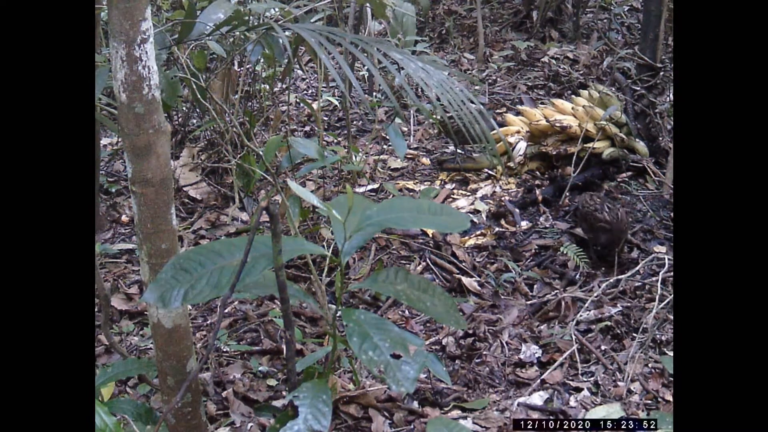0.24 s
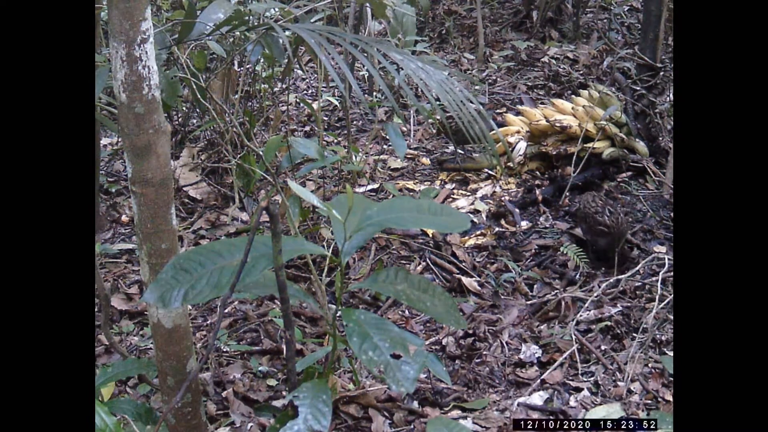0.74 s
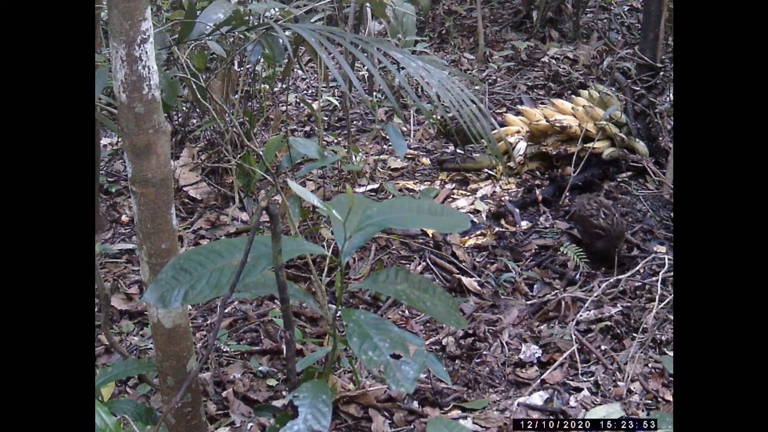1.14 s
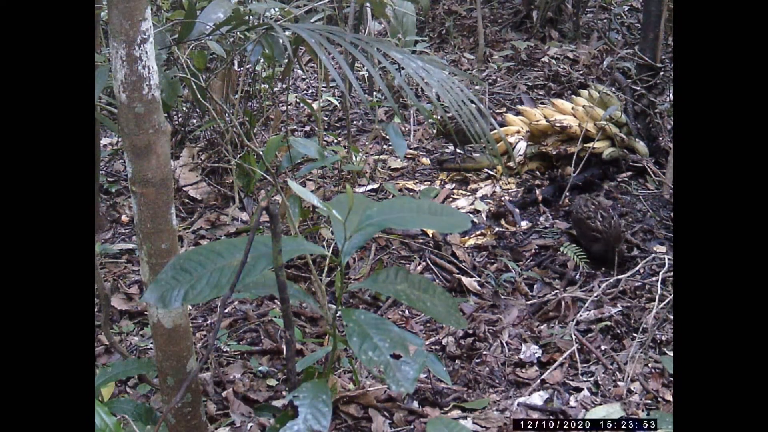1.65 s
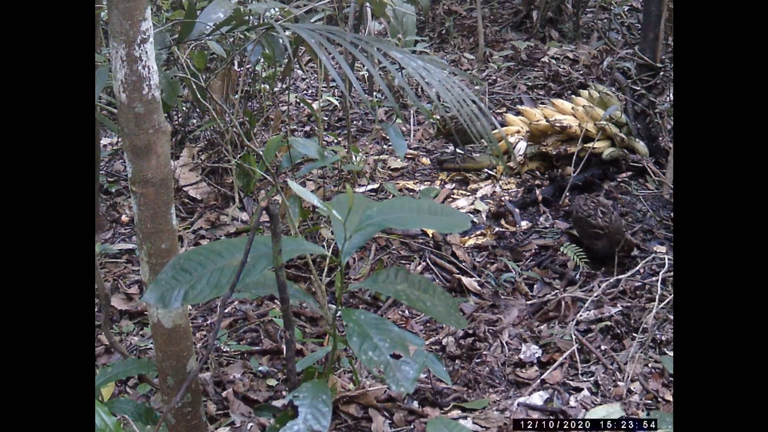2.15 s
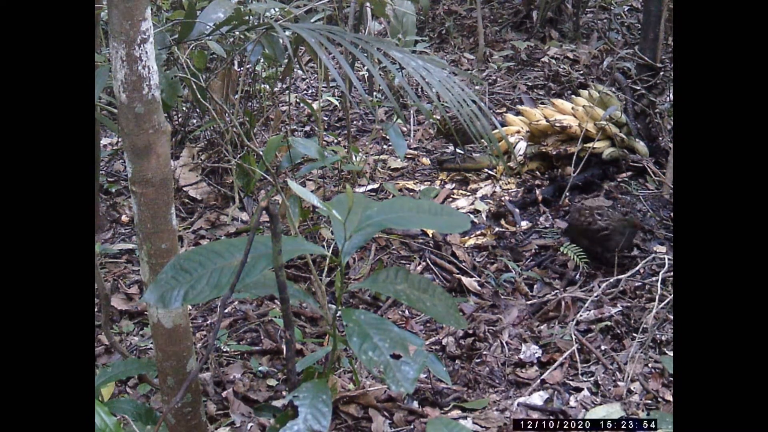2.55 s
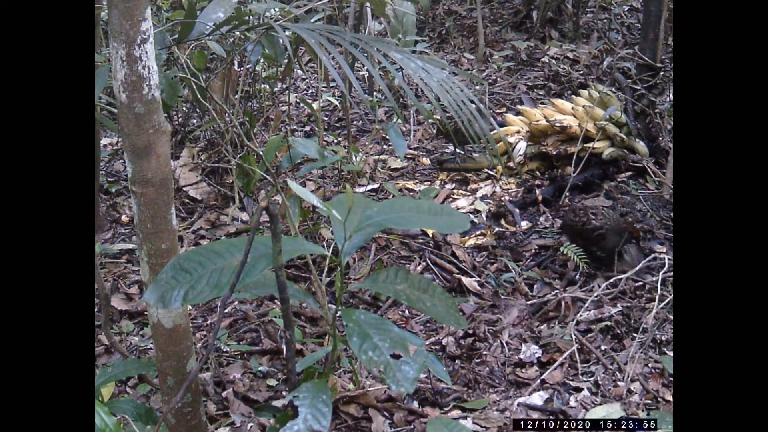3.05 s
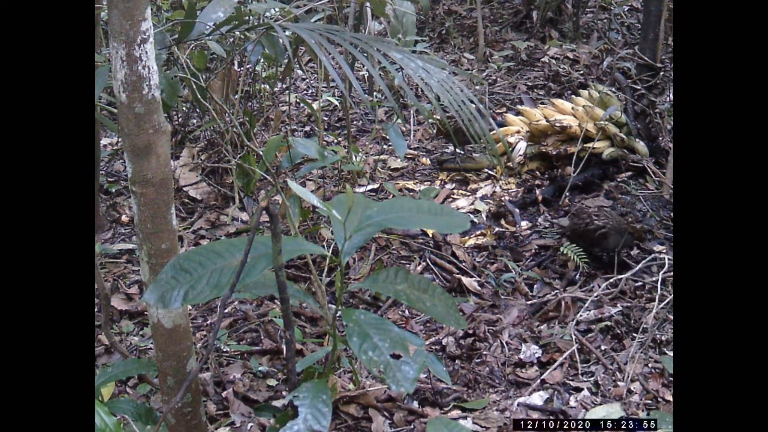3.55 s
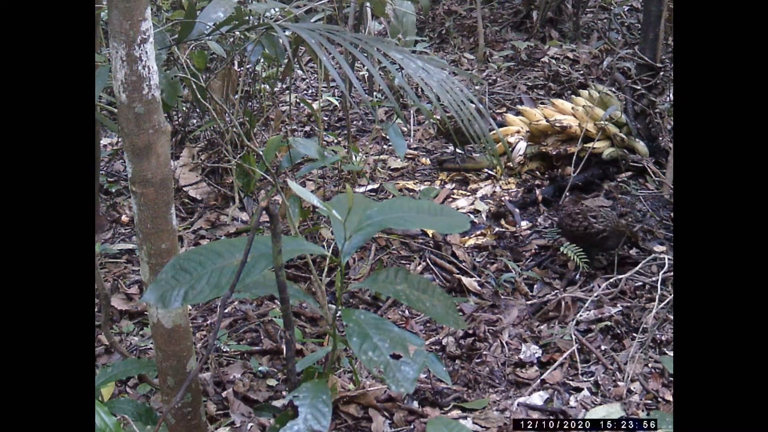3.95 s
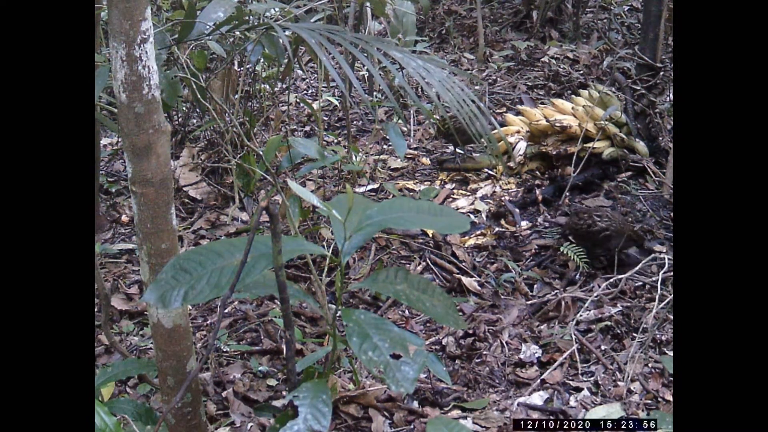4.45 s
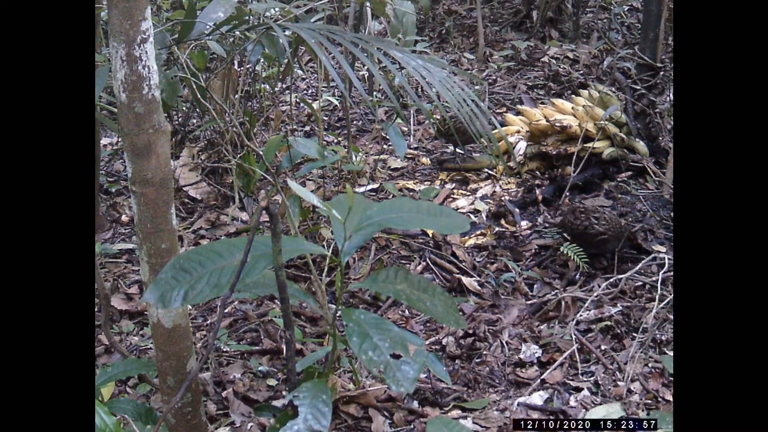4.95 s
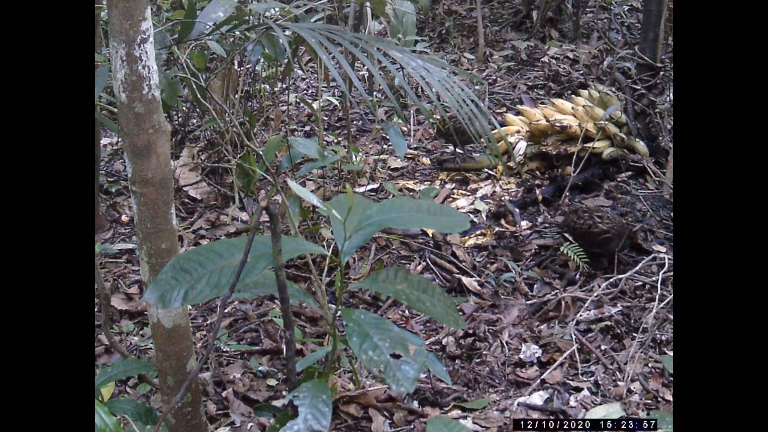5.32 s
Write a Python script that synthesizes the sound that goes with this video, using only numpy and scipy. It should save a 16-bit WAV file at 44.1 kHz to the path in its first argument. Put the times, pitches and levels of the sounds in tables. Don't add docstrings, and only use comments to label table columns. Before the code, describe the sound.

A quiet forest floor by day, heard through a small microphone with soft hiss, low lumpy air rumble, distant hum and faint insect buzz. From 0.05 to 0.55 s a songbird whistles a pure, stepping-down phrase, over a faint distant trill. At 0.95 to 1.6 s it gives a lower, beaded phrase, while the farther bird's fluttering paired rising chirps swell from 0.9 to 2 s, then fade by 2.8 s. Thin high squeaks waver from the canopy, mostly early on. A scooped whistle comes at 2.1 to 2.5 s. At 3 to 3.6 s the song climbs, then settles, as dry leaves crunch and snap until 3.9 s. A held note and quick warble follow at 4.05 to 4.5 s; a sharp snap lands at 4.56 s. The last dipping whistle begins at 5 s, with the trill returning stronger and leaves crackling to the end. Calls leave short woody tails.

```python
import sys
import numpy as np
from scipy import signal
from scipy.fft import rfft, irfft
from scipy.io import wavfile
from scipy.ndimage import uniform_filter1d

SR = 44100
rng = np.random.default_rng(int(sys.argv[2]) if len(sys.argv) > 2 else 0)


def natural_amplitude(level_db):
    exponent = np.asarray(level_db, float) / 20
    return 10 ** exponent


def dump_mix(stems):
    frames = np.atleast_2d(stems).T
    limited = np.clip(frames, -1, 1)
    pcm = np.round(limited * 32767).astype(np.int16)
    wavfile.write(sys.argv[1], SR, pcm)


N = 246057


def at_hz(points, hz):
    point_hz, level_db = np.transpose(points)
    return np.interp(np.log(hz + 1), np.log(point_hz), level_db)


def in_time(rows):
    s, *columns = np.transpose(rows)
    return [np.interp(np.arange(N) / SR, s, c) for c in columns]


def band_one(x, low_hz, high_hz):
    band = signal.sosfilt(signal.butter(4, [low_hz, high_hz], "band", fs=SR, output="sos"), x)
    return x / np.std(band)


def coloured(x, spectrum):
    gain_db = at_hz(spectrum, np.fft.rfftfreq(N, 1 / SR))
    return irfft(rfft(x) * natural_amplitude(gain_db), N)


def drift(rate_hz):
    r = np.exp(-2 * np.pi * rate_hz / SR)
    slow = signal.lfilter([1], [1, -2 * r, r * r], rng.standard_normal(N + SR))[SR:]
    return slow / np.std(slow)


def swells(rows, rise_db_per_s, fall_db_per_s, rest_db):
    t = np.arange(0, N, 20) / SR
    s, level_db, held_s = np.transpose(rows)[:, :, None]
    rising_db = rise_db_per_s * np.maximum(s - t, 0)
    falling_db = fall_db_per_s * np.maximum(t - s - held_s, 0)
    loudest_db = (level_db - rising_db - falling_db).max(axis=0)
    return np.maximum(np.interp(np.arange(N) / SR, t, loudest_db), rest_db)


def add(out, start_s, sound):
    at = round(start_s * SR)
    out[at:at + len(sound)] += sound[:N - at]


def glide(length_s, start_hz, end_hz, bend, soft):
    u = np.linspace(0, 1, round(length_s * SR))
    hz = start_hz + (end_hz - start_hz) * u ** bend
    arch = np.abs(np.sin(np.pi * u)) ** soft
    return np.sqrt(2) * arch * np.sin(2 * np.pi * np.cumsum(hz) / SR)


def trunks(x, t60_s, wet_db, first_s, direct=None, bead_db=2.0):
    t = np.arange(SR + SR // 2) / SR
    scatter = rng.standard_normal(len(t))
    near = scatter * natural_amplitude(-60 * t / t60_s)
    far = scatter[::-1] * natural_amplitude(-18 - 60 * t / 1.8)
    tail = (near + far) * np.clip(t / first_s, 0, 1) ** 2
    wet = signal.fftconvolve(x, tail / np.linalg.norm(tail))[:N]
    return (x if direct is None else direct) + natural_amplitude(wet_db + bead_db * drift(25)) * wet


# frequency in Hz, density in dB per Hz.
HUM_SPECTRUM = [(30, -4.5), (50, -6), (120, -15), (270, -19.5), (550, -24), (1000, -28), (2600, -32.5),
                (3500, -29.5), (4000, -40), (6400, -41.5), (7500, -71), (10000, -48.5), (15500, -41)]


def forest_hum():
    hum = band_one(coloured(rng.standard_normal(N), HUM_SPECTRUM), 145.6, 990)
    return hum * natural_amplitude(-65.5 + .7 * drift(4.05))


def insects():
    centre_hz, width_hz, level_db = 6000, 300, -73
    r = np.exp(-np.pi * width_hz / SR)
    resonance = [1, -2 * r * np.cos(2 * np.pi * centre_hz / SR), r * r]
    buzz = signal.lfilter([1, 0, -1], resonance, rng.standard_normal(N))
    return natural_amplitude(level_db + 1.5 * drift(5.5)) * buzz / np.std(buzz)


# frequency in Hz, density in dB per Hz.
RUMBLE_SPECTRUM = [(12, 8), (25, 5), (45, -11.5), (70, -10), (92, -14.5), (115, -38.5), (200, -59)]
# start in seconds, level in dB, hold in seconds.
GUSTS_ON_PORT = [(.06, -45.5, 0.12), (.25, -54, 0.079), (.5, -52, 0.56), (.75, -62, 0.17),
                 (.96, -46, 0.074), (1.4, -44, 0.012), (1.7, -47, 0.084), (2.07, -48.5, 0.0097),
                 (2.3, -50, 0.027), (2.7, -50.5, 0.19), (2.87, -59, 0.48), (3.37, -46.5, .01),
                 (3.7, -49, 0.036), (4.07, -49, 0.02), (4.3, -53.5, 0.029), (4.82, -56.5, 0.017),
                 (4.99, -53.5, 0.023), (5.33, -64, 0.13)]


def port_rumble():
    level_db = swells(GUSTS_ON_PORT, rise_db_per_s=219, fall_db_per_s=98.5, rest_db=-71)
    rumble = band_one(coloured(rng.standard_normal(N), RUMBLE_SPECTRUM), 9.4, 130)
    return rumble * natural_amplitude(level_db + 0.5 * drift(32))


# frequency in Hz, density in dB per Hz.
LITTER_SPECTRUM = [(1180, -31), (2000, -6), (2500, -6.5), (3320, -19), (3610, -11), (4180, -7), (5260, -7),
                   (10000, -24), (15500, -52)]
# frequency in Hz, density in dB per Hz.
CRUNCH_SPECTRUM = [(1500, -32.5), (2500, -10), (4000, -9), (5500, -5), (6500, -8.5), (8000, -15.5),
                   (10000, -21.5), (15500, -51)]
# start in seconds, level in dB, hold in seconds.
LITTER_STIRS = [(1.23, -71, 0.059), (1.5, -84, 0.022), (1.91, -71, 0.0082), (2.062, -95, 0.0021),
                (2.69, -83, 0.0057), (2.86, -71, 0.0088), (2.938, -73, 0.0025), (2.99, -67, 0.0083),
                (3.012, -60.5, 0.021), (3.05, -65, 0.048), (3.1, -63.5, 0.05), (3.155, -65, 0.041),
                (3.21, -65, 0.045), (3.28, -72, 0.025), (3.4, -77, 0.29), (3.35, -63, 0.026),
                (3.39, -69, 0.04), (3.604, -65, 0.0029), (3.668, -63, 0.021), (3.7, -65, 0.012),
                (3.722, -66, .008), (3.735, -69, .01), (3.748, -57.5, 0.012), (3.772, -64.5, 0.016),
                (3.826, -62.5, 0.02), (3.85, -69, 0.015), (3.9, -68.5, 0.085), (4.292, -68, 0.011),
                (4.33, -73.5, 0.088), (4.45, -70.5, 0.068), (4.562, -60.5, 0.0094), (4.6, -65.5, 0.07),
                (4.71, -67.5, 0.019), (4.76, -71, 0.034), (5.13, -67, 0.031), (5.3, -72.5, 0.084),
                (5.44, -61.5, 0.014), (5.49, -67, .02), (5.535, -64.5, 0.052)]


def leaf_crackle():
    stir_db = swells(LITTER_STIRS, rise_db_per_s=599, fall_db_per_s=395, rest_db=-120)
    rest_db = -76.5 + .8 * drift(8)
    sizes = natural_amplitude(1.8 * np.minimum(rng.exponential(1, N), 5)) * rng.choice([-1, 1], N)
    grains_per_s = 4500 * natural_amplitude(3.2 * drift(45))
    grains = sizes * (rng.random(N) < grains_per_s / SR)
    litter = band_one(coloured(grains, LITTER_SPECTRUM), 7980, 9450)
    crunch = band_one(coloured(grains[::-1], CRUNCH_SPECTRUM), 7880, 10260)
    return natural_amplitude(rest_db - 8.0) * litter + natural_amplitude(stir_db - 9.0) * crunch


# start in seconds, peak in dB, ring in Hz.
LEAF_SNAPS = [(0.9126, -50, 6180), (1.2294, -57, 4860), (1.305, -51, 6120), (2.06, -51, 8290),
              (2.6884, -55, 6560), (2.759, -65, 3550), (2.783, -58, 3550), (2.976, -54, 3470),
              (2.993, -52, 5210), (3.082, -55, 6000), (3.126, -55, 5500), (3.149, -58, 6500),
              (3.163, -51, 5000), (3.349, -56, 5220), (3.36, -52, 5840), (3.662, -58, 5300),
              (3.679, -57, 6000), (3.72, -53, 5460), (3.909, -55, 5650), (2.8345, -54, 4580),
              (2.8984, -51, 5900), (2.9352, -56, 7070), (3.009, -46, 6170), (3.02, -51, 5140),
              (3.027, -50, 4660), (3.103, -53, 4170), (3.108, -53, 6350), (3.178, -52, 4560),
              (3.208, -54, 3950), (3.3276, -45.5, 6440), (3.404, -61, 7670), (3.525, -50, 5320),
              (3.6032, -41, 5850), (3.6708, -53, 4580), (3.7056, -48, 5590), (3.751, -48, 5520),
              (3.7587, -48, 5420), (3.767, -40, 5000), (3.8, -56, 4900), (3.8285, -55, 5600),
              (3.8347, -48, 6030), (4.292, -53, 4420), (4.466, -59, 4390), (4.4957, -44, 4400),
              (4.564, -34.5, 6130), (4.713, -51, 2995), (5.1552, -71, 5570), (5.27, -52, 5630),
              (5.378, -52, 5550), (5.4156, -54, 5430), (5.447, -52, 5250), (5.535, -53, 5550),
              (5.572, -51, 5920), (4.58, -48, 5310)]


def leaf_snaps():
    out = np.zeros(N)
    t = np.arange(400) / SR
    leaf = signal.butter(3, [2000, 9500], "band", fs=SR, output="sos")
    for s, peak_db, hz in LEAF_SNAPS:
        crack = rng.standard_normal(len(t)) * natural_amplitude(-60 * t / 0.0078)
        ring = 1.77 * np.sin(2 * np.pi * hz * t) * natural_amplitude(-60 * t / 0.0045)
        add(out, s, natural_amplitude(peak_db) * signal.sosfilt(leaf, crack + ring))
    return out


# start and length in seconds, start
# and end in Hz, level in dB.
NEAR_GLIDES = [(.878, .112, 1640, 2680, -67), (2.925, .045, 1400, 1800, -68),
               (2.965, .016, 1800, 2230, -61), (2.98, .016, 2200, 1950, -65),
               (3.018, .025, 2100, 2150, -62), (4.092, .02, 1250, 1680, -70), (4.108, .02, 1640, 1740, -69),
               (4.56, .078, 1950, 2760, -62), (4.18, .07, 3700, 3490, -76), (2.236, .014, 1570, 1800, -57),
               (2.374, .014, 1570, 1800, -57), (2.515, .02, 1960, 1790, -53), (1.795, .03, 1300, 1720, -70)]
# start and length in seconds, start and end in Hz, level in dB.
FAR_SQUEAKS = [(.05, .04, 6220, 6200, -76), (.155, .075, 6000, 5930, -67), (.1, .15, 7100, 6600, -79),
               (.25, .07, 6750, 7050, -78), (.4, .13, 7150, 6700, -75), (.55, .05, 7150, 6900, -79),
               (.6, .12, 6750, 6380, -73), (.72, .1, 6450, 6300, -80), (.8, .19, 6500, 6150, -72),
               (1.0, .07, 6300, 6200, -76), (1.06, .11, 6200, 5850, -66), (1.23, .1, 6600, 6100, -76),
               (2.13, .16, 6620, 6280, -73), (2.3, .15, 6250, 6050, -77), (2.18, .06, 8650, 8420, -82),
               (4.05, .11, 6350, 6300, -72), (5.13, .1, 5700, 5600, -73), (3.69, .05, 2700, 2300, -68),
               (2.99, .03, 8400, 8000, -75), (3.03, .03, 7800, 7450, -73), (3.055, .04, 7500, 8200, -70),
               (3.11, .05, 8000, 7600, -75), (3.2, .03, 7600, 8150, -73)]


def small_birds():
    near, far = np.zeros((2, N))
    for out, calls, bend in ((near, NEAR_GLIDES, 1.25), (far, FAR_SQUEAKS, .8)):
        for s, length_s, start_hz, end_hz, level_db in calls:
            add(out, s, natural_amplitude(level_db) * glide(length_s, start_hz, end_hz, bend, soft=.35))
    near = near * natural_amplitude(2.5 * drift(40))
    far = far * natural_amplitude(5.5 * drift(350) - 2.5)
    near = trunks(near, t60_s=0.33, wet_db=-10.0, first_s=0.009)
    return near + trunks(far, t60_s=0.3, wet_db=1.5, first_s=0.0052, bead_db=.5)


# start in seconds, syllable count, period in seconds, start and end in Hz.
TRILL_BOUTS = [(.0, 6, 0.11, 3290, 3720), (0.81, 1, 0.12, 2870, 3340), (.855, 1, .1, 3560, 3790),
               (.916, 9, .118, 2965, 3720), (2.001, 7, 0.12, 3050, 3700), (3.48, 1, 0.095, 2540, 3080),
               (3.575, 1, .1, 2540, 2880), (3.919, 1, 0.1, 2720, 3260), (4.041, 1, 0.1, 2707, 3240),
               (4.67, 1, 0.1, 2565, 3347), (4.764, 1, 0.1, 2450, 3546), (4.864, 1, 0.1, 2640, 3360),
               (4.968, 1, 0.09, 2676, 3440), (5.054, 3, 0.09, 2910, 3600), (5.33, 1, 0.1, 2875, 3630),
               (5.432, 2, 0.106, 2970, 3687)]
# time in seconds, level in dB.
TRILL_LOUDNESS = [(0, -70), (.54, -71.5), (.811, -62), (.855, -67.5), (.915, -56), (1.145, -55.5),
                  (1.39, -54), (1.51, -55), (1.63, -54.5), (1.75, -55), (1.88, -54.5), (2.0, -65.5),
                  (2.12, -64), (2.24, -62.5), (2.36, -63), (2.48, -64.5), (2.6, -64), (2.72, -73),
                  (3.48, -67), (3.57, -80), (3.92, -67), (4.04, -72), (4.665, -67), (4.765, -65.5),
                  (4.865, -66), (4.97, -67.5), (5.055, -63), (5.145, -63.5), (5.235, -62.5), (5.33, -57.5),
                  (5.43, -55.5), (5.54, -53.5)]


def triller():
    jitter_s, jitter_hz, jitter_db = .002, 22, .7
    turning_db_per_s, faint_second_db = 7, 5
    out, direct = np.zeros((2, N))
    for first_s, count, period_s, bout_low_hz, bout_high_hz in TRILL_BOUTS:
        for k in range(round(count)):
            due_s = first_s + k * period_s
            chance = rng.standard_normal(4)
            s = abs(due_s + jitter_s * chance[0])
            low_hz = bout_low_hz + jitter_hz * chance[1]
            high_hz = bout_high_hz + jitter_hz * chance[2]
            level_db = np.interp(due_s, *np.transpose(TRILL_LOUDNESS)) + jitter_db * chance[3]
            facing_db = .8 * min(level_db + 58, 0) - turning_db_per_s * np.clip(s - 1.1, 0, .5)
            second_db = -7.5 + faint_second_db * (level_db < -59)
            strokes = [(0, 2.5, 0.04, low_hz, high_hz),
                       (.044, -4, 0.0257, high_hz, low_hz * 1.05),
                       (.066, second_db, 0.047, low_hz * 1.04, high_hz)]
            for lag_s, stroke_db, length_s, start_hz, end_hz in strokes:
                chirp = glide(length_s, start_hz, end_hz, bend=0.885, soft=0.25)
                chirp = natural_amplitude(level_db + stroke_db) * chirp
                at_s = min(s + lag_s, N / SR)
                add(out, at_s, chirp)
                add(direct, at_s, natural_amplitude(facing_db) * chirp)
    eddies = natural_amplitude(1.6 * drift(130))
    flutter_hz = 119 * (1 + 0.078 * drift(29))
    throat = 1 + .42 * np.sin(2 * np.pi * np.cumsum(flutter_hz) / SR)
    gain = eddies * throat
    return trunks(out * gain, t60_s=.33, wet_db=.8, first_s=.008, direct=direct * gain, bead_db=.3)


# time in seconds, pitch in Hz, level in dB.
STEP_DOWN_PHRASE = [(.05, 2587, -56.5), (.121, 2307, -35), (.179, 2235, -41), (.207, 2220, -57),
                    (.274, 2316, -35.5), (.305, 2354, -39), (.328, 2050, -43.5), (.4, 2072, -46.5),
                    (.547, 2044, -48)]
STEP_UP_PHRASE = [(0.951, 1585, -55), (1.037, 1558, -46), (1.085, 1868, -43.5), (1.098, 1800, -46.5),
                  (1.113, 1570, -45.5), (1.15, 1560, -49), (1.2, 1560, -45), (1.25, 1600, -53)]
BEADED_PHRASE = [(1.251, 1603, -52), (1.274, 1956, -55), (1.296, 2058, -47), (1.369, 2005, -47),
                 (1.44, 1982, -46), (1.47, 1983, -51), (1.52, 1994, -45.5), (1.56, 1976, -59),
                 (1.607, 2022, -53)]
SCOOPED_PHRASE = [(2.083, 2346, -49.5), (2.156, 2160, -39.5), (2.227, 2104, -35.5), (2.24, 2054, -38),
                  (2.361, 2051, -42.5), (2.39, 2012, -40.5), (2.477, 2035, -44.5), (2.532, 1947, -48.5)]
CLIMB_PHRASE = [(2.969, 1647, -56), (3.024, 1712, -49), (3.077, 1752, -45.5), (3.122, 1577, -44),
                (3.15, 1688, -40.5), (3.208, 1903, -38.5), (3.241, 2066, -40.5), (3.285, 2406, -43),
                (3.305, 2503, -60)]
SETTLE_PHRASE = [(3.35, 2123, -57), (3.372, 2083, -50), (3.416, 1830, -41), (3.44, 1787, -50),
                 (3.454, 1902, -39.5), (3.524, 1823, -41.5), (3.562, 1813, -65), (3.599, 1792, -51)]
HELD_PHRASE = [(4.034, 2185, -58), (4.061, 2088, -46.5), (4.143, 2087, -36), (4.175, 2114, -38.5),
               (4.184, 1833, -39), (4.21, 1770, -49.5), (4.256, 1754, -44.5)]
WARBLED_PHRASE = [(4.258, 1760, -51.5), (4.295, 1850, -40.5), (4.325, 1810, -48.5), (4.365, 1830, -43.5),
                  (4.405, 1850, -42), (4.445, 1860, -42.5), (4.475, 1860, -41), (4.505, 1840, -53.5)]
DIP_PHRASE = [(4.963, 2207, -62), (4.989, 2160, -43.5), (5.009, 2077, -41.5), (5.052, 1706, -42),
              (5.07, 1793, -51), (5.102, 1840, -38), (5.19, 1867, -36), (5.255, 1819, -48),
              (5.399, 1752, -46)]
SONG = [STEP_DOWN_PHRASE, STEP_UP_PHRASE, BEADED_PHRASE, SCOOPED_PHRASE, CLIMB_PHRASE, SETTLE_PHRASE,
        HELD_PHRASE, WARBLED_PHRASE, DIP_PHRASE]
# time in seconds, drop in dB, half width in seconds, scoop from below in Hz.
VOICE_CATCHES = [(1.41, 18, 0.026, 1.3), (1.468, 14, .01, 0.89), (1.495, 15, 0.015, 0.89),
                 (1.546, 0.5, 0.051, 157), (2.24, 25, 0.0085, 490), (2.375, 31, 0.0098, 490),
                 (2.501, 9, 0.013, 29.4), (3.171, 9, 0.027, 1.07), (3.224, 11, 0.016, 1.3),
                 (3.44, 13, 0.0078, 1.45), (4.259, 16, 0.015, 1.77), (5.392, 8.5, 0.027, 117)]
# start and end in seconds, turns per second, depth in Hz.
SONG_VIBRATO = (.325, .55, 30.5, 45.)


def songbird():
    t = np.arange(N) / SR
    hz, level_db = in_time([row for phrase in SONG for row in phrase])

    note_s, warble_up_hz, warble_catch_db = .039, 275.5, 7
    switches_s = 4.266 + note_s * np.arange(6)
    for s in switches_s[::2]:
        hz = hz + warble_up_hz * (t > s) * (t < s + note_s)
    warble_catches = [(s, warble_catch_db, .012, 0) for s in switches_s[1:]]

    scoop_s, attack_s = .012, .013
    for s, drop_db, half_s, scoop_hz in list(VOICE_CATCHES) + warble_catches:
        level_db = level_db - drop_db * np.clip(1 - abs(t - s) / half_s, 0, 1)
        hz = hz - scoop_hz * (t > s) * np.exp(-abs(t - s) / scoop_s)
    hz = uniform_filter1d(hz, size=120)
    start_s, end_s, turns_hz, depth_hz = SONG_VIBRATO
    hz = hz + depth_hz * np.sin(2 * np.pi * turns_hz * (t - start_s)) * (t > start_s) * (t < end_s)

    singing = np.zeros(N)
    for phrase in SONG:
        singing += np.clip((t - phrase[0][0]) / attack_s, 0, 1) * (t <= phrase[-1][0])
    gain = uniform_filter1d(natural_amplitude(level_db) * singing, size=260)
    gain = gain * natural_amplitude(1.28 * drift(38))
    phase = 2 * np.pi * np.cumsum(hz) / SR
    voice = np.sqrt(2) * gain * (np.sin(phase) + natural_amplitude(-38) * np.sin(2 * phase))
    return trunks(voice, t60_s=.45, wet_db=-10, first_s=.012, bead_db=1.0)


def scene():
    background = forest_hum() + insects() + port_rumble()
    leaves = leaf_crackle() + leaf_snaps()
    return (background + leaves + small_birds() + triller() + songbird())[None]


# start and end in seconds, depth in dB.
GATE_LULLS = [(-.2, 0.033, 3), (0.556, 0.706, 2.5), (1.599, 1.628, 1.5), (1.825, 2.039, 3),
              (2.496, 2.703, 3.5), (2.714, 2.762, 6.5), (2.756, 2.97, 3.5), (3.599, 3.641, 4.5),
              (3.848, 4.028, 3.5), (4.494, 4.566, 6.5), (4.543, 4.695, 4.5), (4.788, 4.966, 4.5)]


def gate_db():
    sink_s, reopen_s = 0.081, 0.015
    t = np.arange(N) / SR
    sunk_db = np.zeros(N)
    for start_s, end_s, depth_db in GATE_LULLS:
        sinking = (t - start_s) / min(sink_s, end_s - start_s)
        reopening = 1 - (t - end_s) / reopen_s
        sunk_db += depth_db * np.clip(np.minimum(sinking, reopening), 0, 1)
    return 0.7 * drift(14.0) - sunk_db


def roll_off(x):
    return signal.sosfilt(signal.butter(12, 15640, fs=SR, output="sos"), x)


def record(dry):
    hiss_filter = signal.butter(2, 3000, "high", fs=SR, output="sos")
    hiss = signal.sosfilt(hiss_filter, rng.standard_normal(dry.shape))
    heard = dry + natural_amplitude(-79 + .4 * drift(6)) * hiss
    rolled = signal.sosfilt(signal.butter(2, 14000, fs=SR, output="sos"), heard)
    gated = rolled * natural_amplitude(gate_db())
    mix = signal.sosfilt(signal.cheby2(20, 50, 15700, fs=SR, output="sos"), gated)
    return roll_off(mix)


dry = scene()
out = record(dry)
dump_mix(out)
```